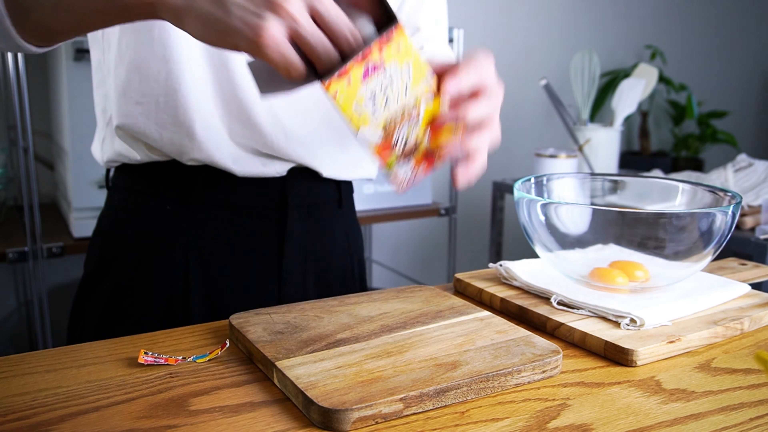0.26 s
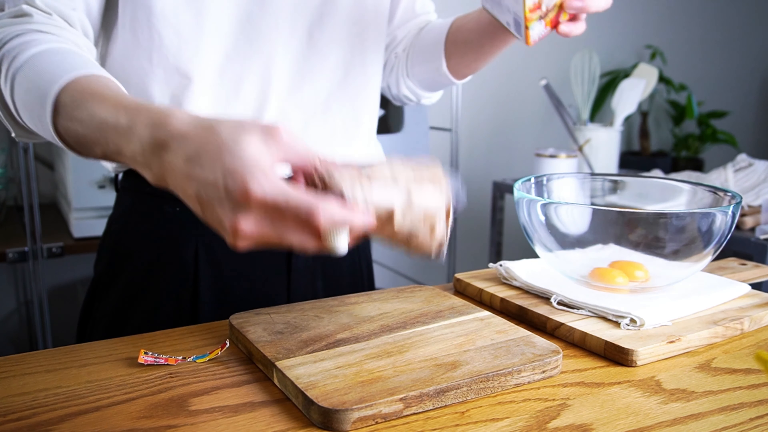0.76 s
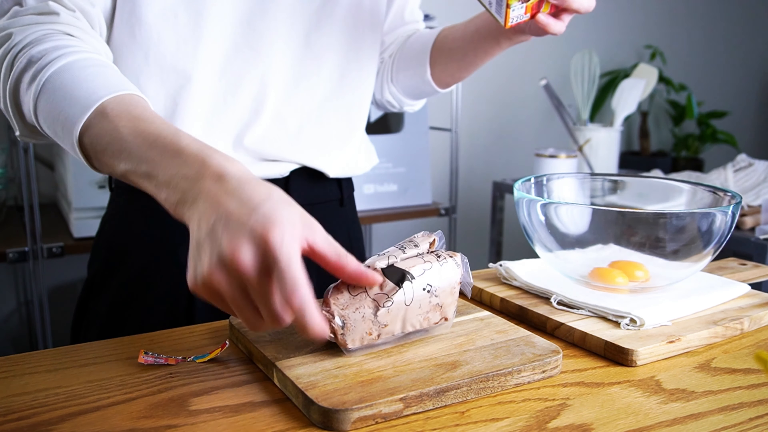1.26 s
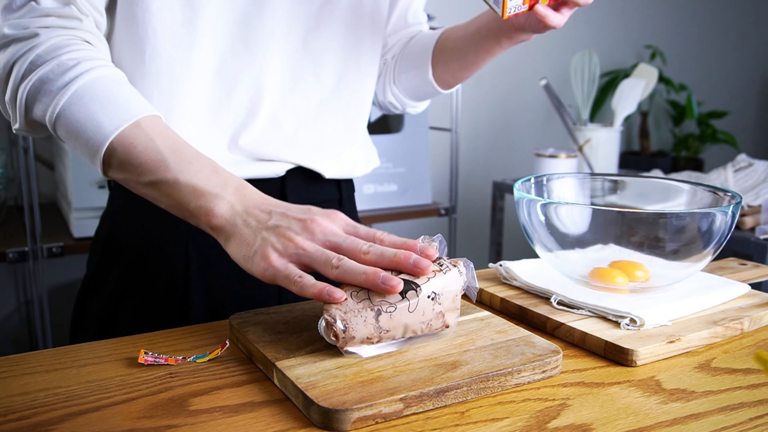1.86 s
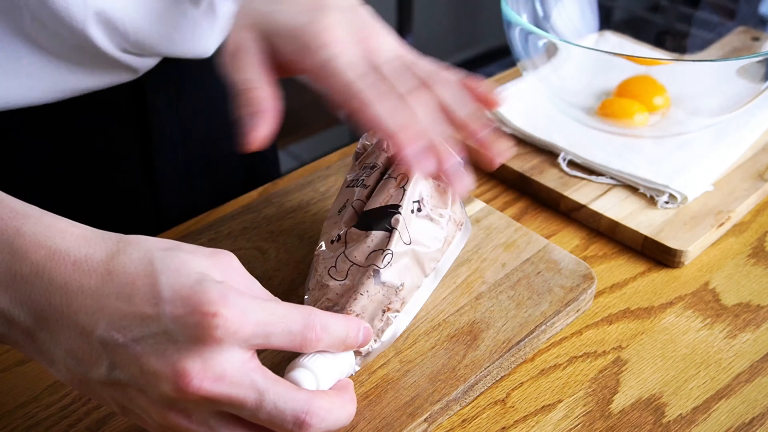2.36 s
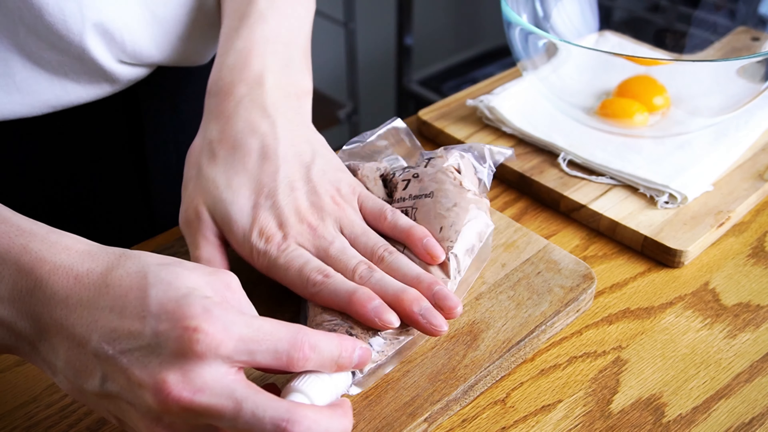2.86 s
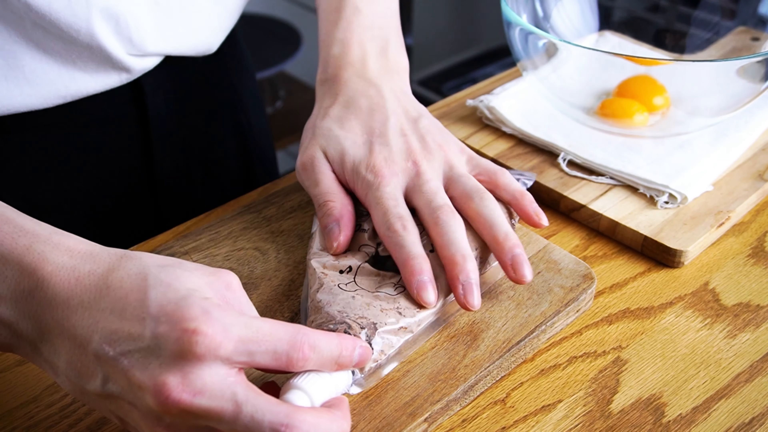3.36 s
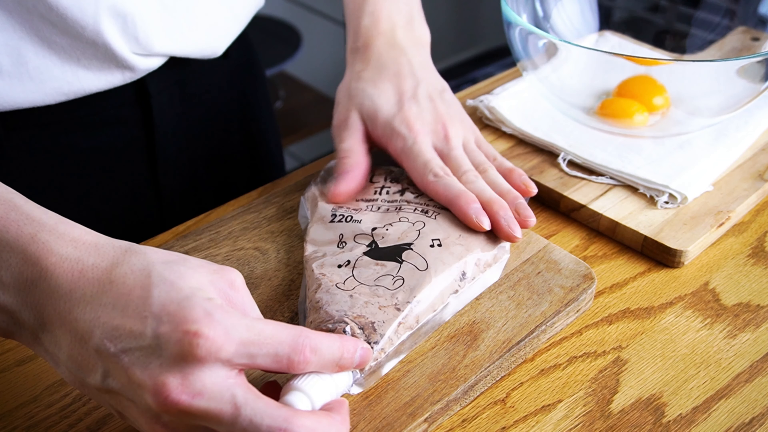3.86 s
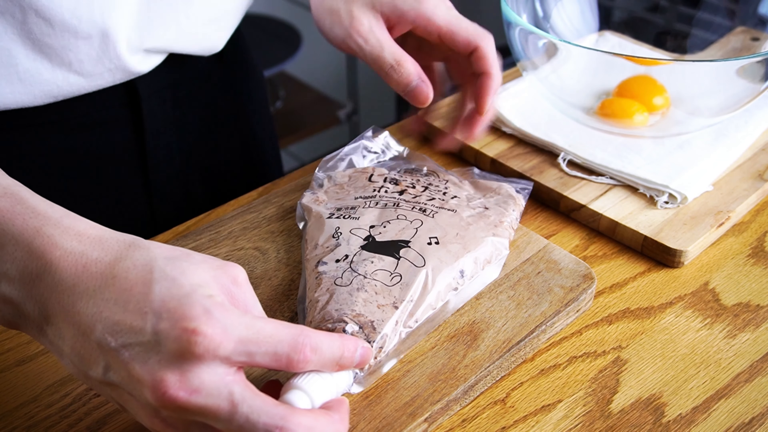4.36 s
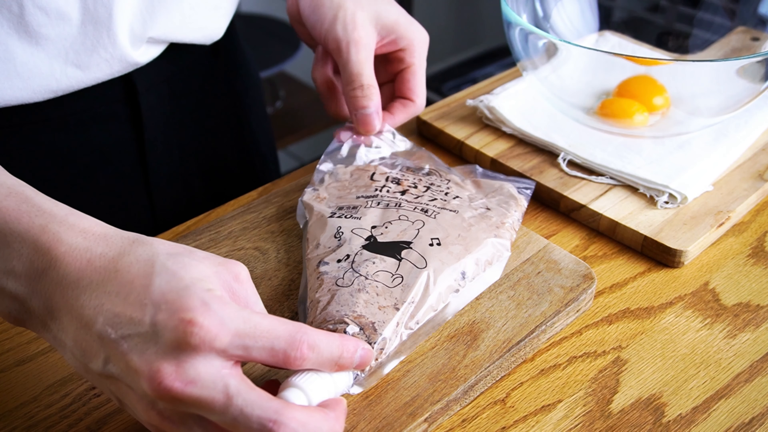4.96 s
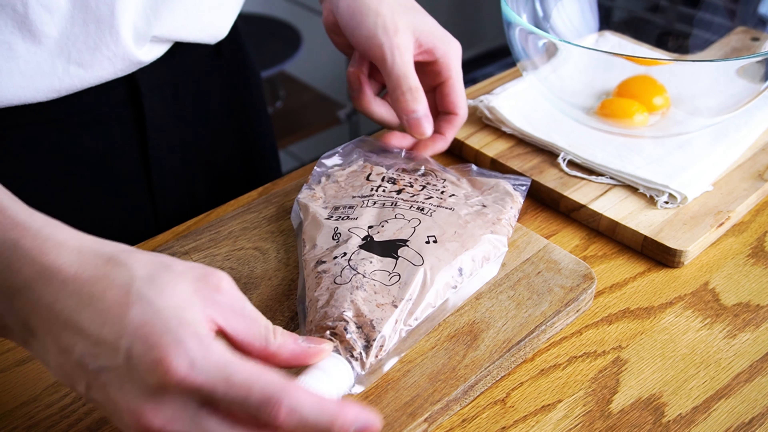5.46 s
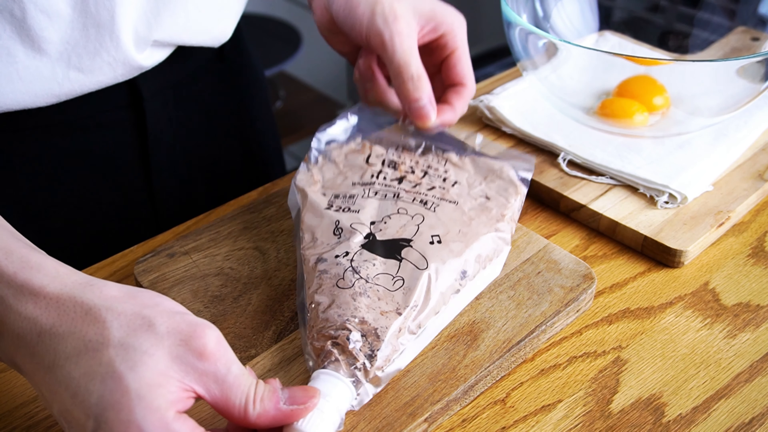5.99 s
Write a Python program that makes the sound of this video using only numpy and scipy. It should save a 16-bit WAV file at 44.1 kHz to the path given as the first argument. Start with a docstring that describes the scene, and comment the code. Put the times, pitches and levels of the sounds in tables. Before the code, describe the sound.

Hands open packaging on a wooden board close to the microphone. First comes rustling and a quarter-second rip of card, then one hard bang with a brief resonant tail. Crisp wrapper and thicker bag plastic follow, crackling in short grips separated by small gaps, with bright cracks, quick ticks and low soft knocks. The small room adds a short tail and quiet background hiss.

```python
"""Opening food packaging on a board

Packaging is opened on a wooden kitchen board, close to the microphone: a carton rips, its flap pops free,
and a film wrapper and a full piping bag crinkle, slip and bump on the board. Crinkling and ticks are runs of
short damped rings, the rip is shaped noise, the pop and bumps excite decaying modes of carton and board.
A small bright room answers with a noise tail, and the sharpest snaps run into the recorder's limiter."""
import sys
import numpy as np
from scipy import signal
from scipy.fft import rfft, irfft, next_fast_len
from scipy.io import wavfile
from scipy.ndimage import uniform_filter1d, minimum_filter1d

SR = 44100
rng = np.random.default_rng(int(sys.argv[2]) if len(sys.argv) > 2 else 0)


def unload_wav(signal):
    """Save mono or channel-first audio to the path in sys.argv[1] as 16-bit WAV at rate SR, clipped to [-1, 1]."""
    wavfile.write(
        sys.argv[1],
        SR,
        np.round(np.clip(np.atleast_2d(signal).T, -1, 1) * 32767).astype(np.int16),
    )


N = 274743  # samples
POP_S = 1.205  # the flap springs free


def amp(db):
    """Level law: decibels to amplitude gain."""
    return 10 ** (np.asarray(db) / 20)


def unit(x):
    """Power normalisation: scale to rms 1."""
    return x / np.sqrt(np.mean(x ** 2) + 1e-20)


def along(points, hz):
    """Spectral interpolation: (frequency, value) points joined on a log frequency axis."""
    f, v = np.transpose(points)
    return np.interp(np.log(hz + 1), np.log(f + 1), v)


def curves(rows):
    """Envelope interpolation: one value per sample for each column after the time."""
    s, *cols = np.transpose(rows)
    return [np.interp(np.arange(N) / SR, s, c) for c in cols]


def filtered(x, response):
    """Linear filtering: the spectrum of x times a response of frequency."""
    m = next_fast_len(N + SR // 2)
    return irfft(rfft(x, m) * response(np.fft.rfftfreq(m, 1 / SR)), m)[..., :N]


def high_pass(x, edge_hz):
    """Radiation efficiency: thin film radiates little below its edge frequency, here a second-order slope."""
    return signal.lfilter(*signal.butter(2, min(edge_hz, SR / 3), 'highpass', fs=SR), x)


def add(track, s, sound):
    """Superposition: mix a sound into the track at time s."""
    start = int(np.clip(round(s * SR), 0, N))
    track[start:start + len(sound)] += sound[:N - start]


def wobble(rate):
    """Slow modulation: a random curve of straight pieces, rate knots a second."""
    return np.interp(np.arange(N) * rate / SR, np.arange(4096), rng.standard_normal(4096))


def creases():
    """Snap-through buckling: single loud snaps of creases that stand out of the crinkling; the row at 1.2056 s
    is instead the sharp crack of the flap as it springs free."""
    # Snapping creases, and at 1.2056 s the crack of the popping flap: (time [s], relative level over 1 ms [dB],
    # pitch [Hz])
    loud_snaps = [(0.1442, -4, 1730), (0.595, 5, 2400), (0.6385, -3.5, 2560), (0.6886, -6.5, 7450),
                  (0.8784, -18, 8600), (1.0653, -9.5, 4510), (1.2056, 3.5, 5300), (1.7793, -9.5, 1570),
                  (1.8301, -7.5, 2480), (1.8448, -3, 3480), (1.973, -14.5, 4400), (2.3642, 0.5, 6800),
                  (2.3866, -13.5, 8550), (2.4208, 0.5, 7750), (2.4412, -12.5, 6700), (2.471, -8.5, 8500),
                  (2.6572, 4, 2160), (2.774, 11, 5260), (2.934, -1, 6100), (3.1071, -15, 6540),
                  (3.2304, -4.5, 3700), (3.2959, -3, 6270), (3.412, 13, 5100), (3.649, -6.5, 3840),
                  (3.7535, -11, 5430), (3.807, -1.5, 6800), (3.8567, -4, 1950), (3.8864, -1, 4270),
                  (3.922, 9, 2520), (3.9649, -8.5, 3630), (3.974, -5.5, 2310), (4.2236, -2.5, 4700),
                  (4.2474, -7, 3420), (4.7748, -6.5, 5230), (4.877, -9.5, 1970), (4.8987, 0, 4140),
                  (4.9602, -10.5, 2170), (5.023, -6, 2400), (5.031, -8, 3750), (5.04, -2, 2660),
                  (5.047, -10.5, 3590), (5.0639, 2, 2720), (5.1004, -9, 2580), (5.2357, -2, 5600),
                  (5.2545, -5, 4600), (5.284, -16, 5000), (5.3242, -9, 2800), (5.393, -6, 7440),
                  (5.4184, -3.5, 5030), (5.5546, -11, 6400), (5.6243, 2, 4770), (5.7106, 0, 1860),
                  (5.862, -5, 3440), (5.9, -12.5, 2060), (5.9255, -2.5, 3240), (5.9804, -5.5, 3170),
                  (6.0689, -6.5, 1870), (6.1251, -0.5, 1880), (6.1298, -9, 2850)]
    out = np.zeros(N)
    for s, db, hz in loud_snaps:
        add(out, s, amp(db) * snap(hz, crack_db=3, octaves=1.1))
    return out


def snap(hz, crack_db, octaves):
    """Impulsive buckling: a facet gives a wide crack around its pitch and a brief ring; energy of 1 ms at rms 1."""
    t = np.arange(SR // 200) / SR
    fade = np.exp(-t / (.0003 + .6 / hz))
    edges = np.clip([hz / 2 ** octaves, hz * 2 ** (octaves / 2)], 100, [SR / 4, SR / 2.4])
    burst = rng.standard_normal(len(t)) * fade
    crack = signal.lfilter(*signal.butter(1, edges, 'bandpass', fs=SR), burst)
    ring = np.sin(2 * np.pi * hz * t) * fade * rng.choice([-1, 1])
    sound = high_pass(unit(ring) + amp(crack_db) * unit(crack), hz / 5)
    return sound / np.linalg.norm(sound) * np.sqrt(SR / 1000)


def slips():
    """Stick-slip friction: taut film lets go in quick, nearly even ticks; one facet rings throughout a slip."""
    # Slipping film: (start [s], end [s], rate [ticks/s], first relative level [dB], last relative level [dB],
    # pitch [Hz])
    slip_runs = [(1.092, 1.145, 150, -27.5, -9, 9700), (1.1658, 1.191, 135, -10, -10.5, 11320),
                 (2.309, 2.358, 205, -20.5, -5, 7700), (2.542, 2.553, 190, -9, 16, 7500),
                 (2.596, 2.622, 320, -9, -0.5, 7240), (2.986, 3.009, 223, -11, -8, 7000),
                 (5.733, 5.751, 330, -17, -8.5, 5460)]
    out = np.zeros(N)
    for start, end, rate, first_db, last_db, hz in slip_runs:
        facet = snap(hz, crack_db=5, octaves=.6)
        for s in np.arange(start, end, 1 / rate):
            db = np.interp(s, [start, end], [first_db, last_db])
            tick = facet + .45 * snap(hz, crack_db=8, octaves=.6)
            bright = high_pass(high_pass(tick, .65 * hz), .65 * hz)
            add(out, s + rng.normal(0, .0002), amp(db) * bright)
    return out


def rustle():
    """Crumpling noise: panels flex low (higher when taut), creases crackle (sharper when crushed), film fizzes."""
    # Tension of the flexing panels: (time [s], power share of the taut panels [0 slack to 1 taut])
    tension = [(.15, 0.8), (.3, 0.75), (.7, 0.25), (.9, 0.94), (1.8, 0.34), (2.7, 0.36), (3.3, 0.024),
               (4.2, 0.02), (4.8, 0.87), (5.2, 0.98), (5.45, 0.51), (5.9, 1)]
    crush_db = -31.5  # above about this crackle level, creases begin to snap through
    card_snap_db = -17.5  # until the flap pops the hands work on card, which snaps less than film
    flex_gain, crackle_gain, slide_gain = grips()

    taut = np.clip(curves(tension)[0], 0, 1)
    slack_panels = grains(count=2000, size=700, pitch_hz=331, spread=0.46, cycles=2.14, scatter_db=5.5)
    taut_panels = grains(count=2500, size=500, pitch_hz=682, spread=0.23, cycles=2.9, scatter_db=3.5)
    flex = np.sqrt(1 - taut) * high_pass(slack_panels, 270)
    flex += np.sqrt(taut) * high_pass(taut_panels, 380)

    fine = grains(count=7000, size=110, pitch_hz=2220, spread=0.54, cycles=0.68, scatter_db=2.0)
    material = np.where(np.arange(N) / SR < POP_S, amp(card_snap_db), 1)
    crushing = crackle_gain / np.hypot(crackle_gain, amp(crush_db)) * material
    sharp = small_snaps(count=700, pitch_hz=3650, scatter_db=22)
    crackle = amp(0.5) * high_pass(fine, 760) + amp(6.0) * crushing * sharp

    # each part gives way at its own moments, so the colour keeps shifting
    parts = [(flex_gain, flex), (crackle_gain, crackle), (slide_gain, sliding())]
    return sum(gain * sound * fits() for gain, sound in parts)


def fits():
    """Intermittent yielding: the film gives way in fits, a random gain of rms 1."""
    return unit(amp(2.6 * wobble(70)))


def grips():
    """Driving force: gains of flexing, crackling and sliding; every grip rises, sags while held and dies away."""
    # Grips of the hands: (start [s], length [s], relative levels of flexing panels [dB],
    # crackling creases [dB], sliding film [dB])
    hand_grips = [(0.0, 0.23, -19.5, -21.5, -22.5), (0.254, 0.4, -18, -20.5, -31),
                  (0.734, 0.084, -46, -39, -33.5), (0.907, 0.043, -34, -38.5, -25.5),
                  (0.989, 0.11, -27.5, -33.5, -23), (1.127, 0.071, -30, -32, -21),
                  (1.632, 0.096, -34, -41.5, -34.5), (1.761, 0.11, -27.5, -27.5, -31.5),
                  (1.913, 0.057, -28, -33, -24.5), (2.331, 0.12, -49, -36.5, -24),
                  (2.544, 0.11, -33, -26, -22.5), (2.644, 0.23, -22.5, -17.5, -25),
                  (2.859, .22, -24, -25.5, -25), (3.178, 0.09, -54, -44, -29),
                  (3.248, 0.11, -36, -25, -17.5), (3.346, 0.2, -23.5, -21.5, -25),
                  (3.571, 0.046, -21, -18.5, -20), (3.628, 0.045, -46, -28, -45),
                  (3.77, 0.21, -41, -28.5, -37), (3.855, 0.193, -28, -27.5, -38),
                  (4.019, 0.18, -18, -24, -27), (4.705, 0.11, -51, -47, -25.5),
                  (4.774, 0.15, -34.5, -32, -30), (5.03, 0.051, -26.5, -22.5, -42.5),
                  (5.115, 0.12, -33, -37.5, -40), (5.335, 0.12, -27, -30.5, -31),
                  (5.474, 0.36, -33.5, -37, -50), (5.856, 0.23, -61, -34, -53)]
    attack_s, release_s = 0.0059, 0.017  # the fingers close quickly; the film settles after they let go
    sag_db_per_s = 5.5  # the film yields under a steady grip
    t, power = np.arange(N) / SR, np.zeros((3, N))
    for start, length, *levels_db in hand_grips:
        part = slice(*np.searchsorted(t, [start, start + length + 10 * release_s]))
        age = t[part] - start
        rise = 1 - np.exp(-age / attack_s)
        fall = np.exp(-np.maximum(age - length, 0) / release_s)
        power[:, part] += np.outer(amp(levels_db), rise * amp(-sag_db_per_s * age) * fall) ** 2
    return np.sqrt(power)


def grains(count, size, pitch_hz, spread, cycles, scatter_db):
    """Shot noise: a dense run of tiny damped rings of random time, pitch and strength, rms 1."""
    start = rng.integers(0, N, (count, 1))
    pitch, strength = rng.standard_normal((2, count, 1))
    hz = np.minimum(pitch_hz * np.exp(spread * pitch), SR / 2)
    turns = hz * np.arange(size) / SR
    rings = np.sin(2 * np.pi * turns) * np.exp(-turns / cycles) * (1 - np.exp(-2 * turns))
    rings *= amp(scatter_db * np.minimum(strength, 2)) * np.sqrt(hz)
    places = (start + np.arange(size)).ravel()
    return unit(np.bincount(places, rings.ravel(), minlength=N)[:N])


def small_snaps(count, pitch_hz, scatter_db):
    """Correlated buckling: lesser creases give way at random; neighbours in time on one fold lean alike in pitch."""
    out, fold = np.zeros(N), wobble(25)
    for place, pitch, size in rng.random((count, 3)):
        octaves = 1.4 * (pitch - .5) + 0.45 * fold[int(place * N)]
        hz = np.clip(pitch_hz * 2 ** octaves, 900, SR / 4)
        add(out, place * N / SR, amp(scatter_db * size ** 2) * snap(hz, crack_db=3, octaves=1.1))
    return unit(out)


def sliding():
    """Friction noise: sliding surfaces fizz, thin wrapper higher than the thick bag."""
    # What slides: (time [s], power share of thin, bright wrapper [0 to 1]); the rest is card or the thick bag
    thin_share = [(.6, 0.22), (.9, 0.46), (1.2, 0.83), (1.7, 0.22), (2.4, 0.76), (3.4, 0.23), (4.7, 0.017)]
    thin = np.clip(curves(thin_share)[0], 0, 1)
    bag = grains(count=12000, size=40, pitch_hz=5500, spread=0.32, cycles=1.5, scatter_db=4.5)
    wrapper = grains(count=7000, size=24, pitch_hz=9600, spread=0.28, cycles=1.1, scatter_db=9)
    return np.sqrt(1 - thin) * high_pass(bag, 3000) + np.sqrt(thin) * high_pass(wrapper, 4500)


def settling(level_db):
    """Stress relaxation: sparse ticks of strained creases, lagging behind the grips."""
    settle_s = 0.044  # time constant of the ticking after a grip
    keep = np.exp(-1 / (settle_s * SR))
    strain = signal.lfilter([1 - keep], [1, -keep], grips()[1])
    return amp(level_db) * strain * small_snaps(count=260, pitch_hz=3270, scatter_db=28)


def rip():
    """Fracture noise: card fibres break densely in one pull; they shake the carton wall and the freed strip."""
    # Ripping carton: (time [s], relative level [dB])
    pull = [(.272, -45), (.283, -17), (.32, -10.5), (.41, -12.5), (.47, -9), (.495, -11), (.53, -7.5),
            (.546, -11), (.552, -30)]
    # Spectrum of torn card: (frequency [Hz], relative level [dB])
    fibres = [(59, -47), (100, -43), (381, -4.5), (524, -13), (570, -21), (1030, -19), (1450, -3),
              (2220, -22), (2800, -5.5), (12400, -11), (16000, -24)]
    level_db, = curves(pull)
    breaks = rng.standard_normal(N) * amp(2 * rng.standard_normal(N))
    tearing = unit(filtered(breaks, lambda hz: amp(along(fibres, hz))))
    wall = high_pass(unit(signal.fftconvolve(breaks, wall_ring())[:N]), 170)
    strip = grains(count=2500, size=400, pitch_hz=2600, spread=.6, cycles=7, scatter_db=3)
    card = unit(tearing + amp(-7) * wall + amp(-3) * strip)
    t = np.arange(N) / SR
    return amp(level_db + 0.73) * card * (t > pull[0][0]) * (t < pull[-1][0])


def wall_ring():
    """Modal impulse response: the carton wall's answer to one blow."""
    # Modes of the carton wall: (frequency [Hz], relative level [dB], t60 [s])
    wall_modes = [(515, -6, 0.033), (810, -10.5, 0.031), (1202, 0.5, 0.017), (1700, -14.5, 0.037),
                  (2720, 0, 0.013), (2936, -2, 0.0067), (3720, -8.5, 0.0023), (4240, -22, 0.0036)]
    t = np.arange(SR // 20) / SR
    return sum(amp(db - 60 * t / t60) * np.cos(2 * np.pi * hz * t) for hz, db, t60 in wall_modes)


def pop(level_db, crack_db, crack_hz):
    """Sudden release: the flap springs free with a loud, short bang; soft card dulls its crack."""
    out, wall = np.zeros(N), wall_ring()
    band = signal.butter(4, [250, min(crack_hz, SR / 3)], 'bandpass', fs=SR, output='sos')
    blow = wall + amp(crack_db) * signal.unit_impulse(len(wall))
    add(out, POP_S, amp(level_db) * signal.sosfilt(band, blow))
    return out


def after_ring(build_s):
    """Lingering resonance: a few tones swell after the pop and fade slowly."""
    # Tones after the pop: (frequency [Hz], level [dB], t60 [s])
    ring_tones = [(570, -29, .5), (1130, -23, .5), (1255, -24, .45), (2780, -19.5, .52), (2985, -19.5, .6)]
    out, t = np.zeros(N), np.arange(SR // 2) / SR
    tones = sum(amp(db - 60 * t / t60) * np.sin(2 * np.pi * (hz * t + rng.random()))
                for hz, db, t60 in ring_tones)
    add(out, POP_S, tones * (1 - np.exp(-t / build_s)))
    return out


def bumps(cycles, board_db, shudder_db, shudder_t60, tick_db):
    """Impact excitation: a soft contact gives a few low cycles and a film tick; board modes near its pitch ring most."""
    # Carton and bag bumping on the board: (time [s], relative level [dB], pitch [Hz])
    contacts = [(0.045, -8.5, 640), (1.027, -2.5, 740), (1.035, -7.5, 175), (1.652, -21, 174),
                (2.731, -3.5, 920), (3.793, -3, 835), (3.802, -7.5, 594), (4.102, -0.5, 350),
                (4.117, -3, 434), (4.606, -5.5, 540), (5.153, -3.5, 970), (5.404, -12, 656),
                (5.528, -12.5, 730), (5.556, -1.5, 650), (5.838, -1, 764), (6.221, -14.5, 990)]
    # Modes of the board on the table: (frequency [Hz], relative level [dB], t60 [s])
    board_modes = [(133, 4.5, 0.11), (205.3, -1, 0.2), (273, -2, 0.13), (403, -9, 0.3), (468.4, -4.5, 0.18),
                   (598, 4, 0.074), (734, 1.5, 0.081), (929, -13, 0.096)]
    out, t = np.zeros(N), np.arange(SR // 6) / SR
    for s, db, hz in contacts:
        turns = hz * t
        push = np.sin(2 * np.pi * turns) * turns / cycles * np.exp(1 - turns / cycles)
        board = np.zeros(len(t))
        for mode_hz, level, t60 in board_modes:
            mode_db = level + rng.normal(0, 1.26) - 6.1 * abs(np.log2(mode_hz / hz))  # loss per octave away
            board += amp(mode_db - 60 * t / t60) * np.sin(2 * np.pi * (mode_hz * t + rng.random()))
        board *= 1 - np.exp(-t / 0.0033)
        edges = np.clip([hz / 2, hz * 1.7], 80, [SR / 8, SR / 4])
        band = signal.butter(3, edges, 'bandpass', fs=SR, output='sos')
        noise = unit(signal.sosfilt(band, rng.standard_normal(len(t))))
        shudder = noise * amp(shudder_db - 60 * t / shudder_t60)
        add(out, s, amp(db) * high_pass(push + amp(board_db) * board + shudder, hz / 4))
        add(out, s + .001, amp(db + tick_db) * snap(5500, crack_db=10, octaves=1.1))
    return out


def early(x, level_db, t60):
    """Early scattering: board, hands and bag spread the sound within a few milliseconds."""
    t = np.arange(SR // 20) / SR
    scatter = rng.standard_normal(len(t)) * amp(-60 * t / t60)
    return amp(level_db) * signal.fftconvolve(x, scatter / np.linalg.norm(scatter))[:N]


def room(x, build_s, absorb_hz):
    """Diffuse reverberation: a tail builds up, then dies at its own speed at each frequency."""
    # Decay of the room: (frequency [Hz], t60 [s])
    decay = [(150, 0.23), (500, 0.37), (3000, 0.43), (12000, 0.41)]
    hz, t, z = signal.stft(rng.standard_normal(SR * 2 // 3), SR, nperseg=256)
    shape = amp(-60 * t / along(decay, hz)[:, None]) * (1 - np.exp(-(t / build_s) ** 2))
    shape = shape / np.hypot(1, hz / absorb_hz)[:, None]  # walls and cloth soak up the treble
    tail = signal.istft(z * shape, SR, nperseg=256)[1]
    return signal.fftconvolve(x, tail / np.linalg.norm(tail))[:N]


def background_air(level_db):
    """Stationary noise: a steady bed of random sound with a coloured spectrum."""
    # Spectrum of the bed: (frequency [Hz], relative level [dB])
    air_spectrum = [(15, -33), (25, -2), (86, -5), (164, -12), (297, -7.5), (349, -23.5), (567, -10.5),
                    (3630, -31), (5580, -13.5), (15500, -18.5)]
    noise = filtered(rng.standard_normal(N), lambda hz: amp(along(air_spectrum, hz)))
    return amp(level_db) * unit(noise)


def scene():
    """Superposition: all handling happens at one spot in front of a single microphone."""
    snaps = amp(0.5) * creases()
    handling = slips() + rustle() + settling(level_db=-8) + rip()
    knocks = bumps(cycles=0.67, board_db=-13.0, shudder_db=-13.5, shudder_t60=0.11, tick_db=-19.5)
    bang = pop(level_db=4, crack_db=9, crack_hz=4200)
    near = early(snaps + handling, level_db=-17, t60=.02)
    # the pop fills the room far more strongly than the rest
    sent = amp(-18) * handling + amp(-16.5) * snaps + amp(-23.5) * knocks + amp(-2.5) * bang
    echo = room(sent, build_s=0.026, absorb_hz=8050)
    direct = snaps + handling + knocks + bang
    mix = direct + near + after_ring(build_s=0.024) + echo + background_air(level_db=-49)
    return np.tile(mix, (2, 1))


def record(dry):
    """Band and peak limiting: treble droops, a fast limiter catches snaps, deep bass and the extreme top are cut."""
    limit_db, top_hz = 4, 16100  # limiter ceiling ahead of hard clipping at 1; band limit
    dull = filtered(dry, lambda hz: 1 / np.sqrt(1 + (hz / 15500) ** 6))
    needed = 1 / np.maximum(1, np.abs(dull) / amp(limit_db))
    held = dull * uniform_filter1d(minimum_filter1d(needed, size=45), size=45)
    clipped = np.clip(held, -1, 1)
    return filtered(clipped, lambda hz: hz / np.hypot(hz, 70) / np.sqrt(1 + (hz / top_hz) ** 160))


dry = scene()
out = record(dry)
unload_wav(out)
```